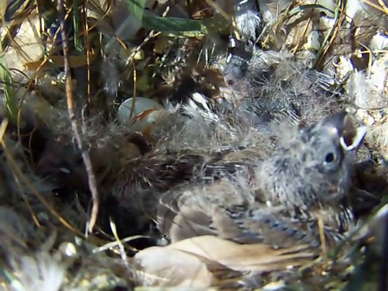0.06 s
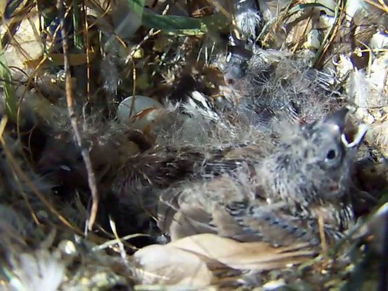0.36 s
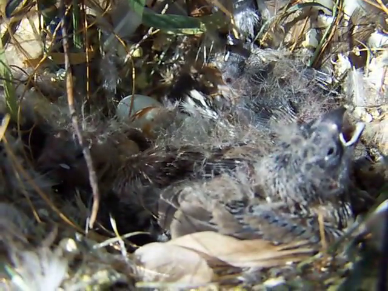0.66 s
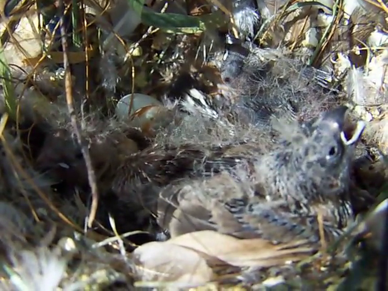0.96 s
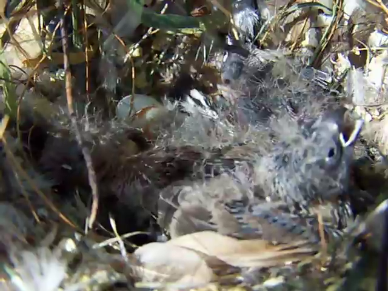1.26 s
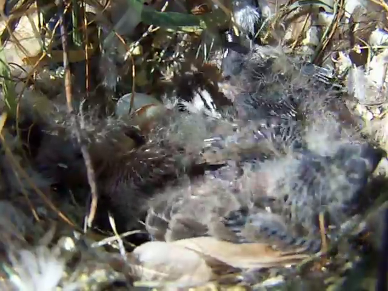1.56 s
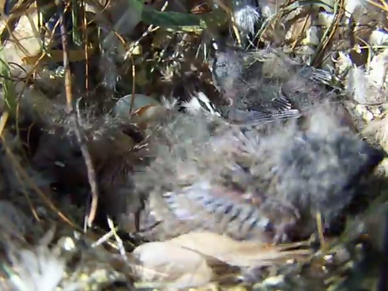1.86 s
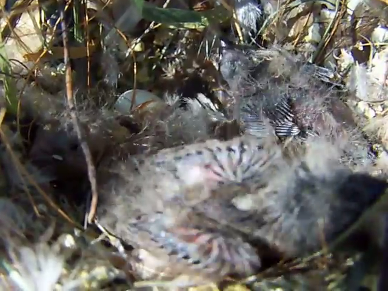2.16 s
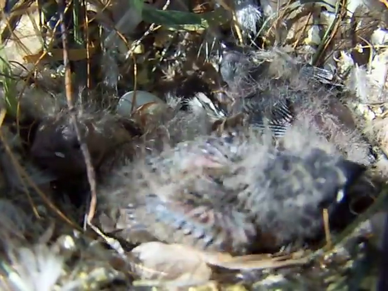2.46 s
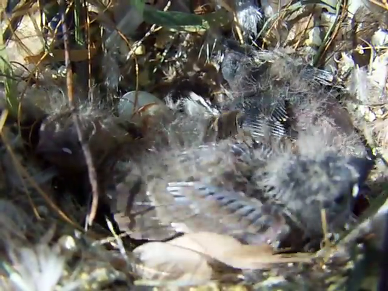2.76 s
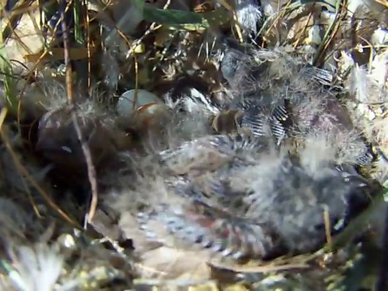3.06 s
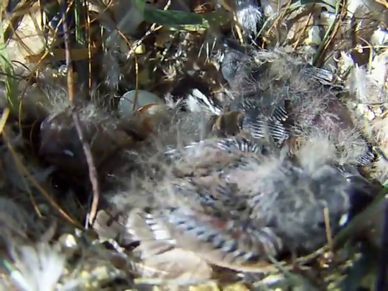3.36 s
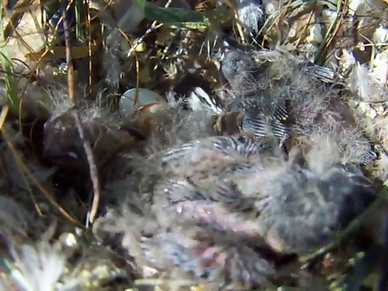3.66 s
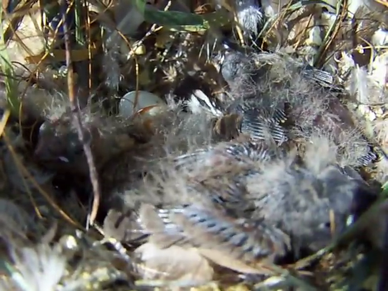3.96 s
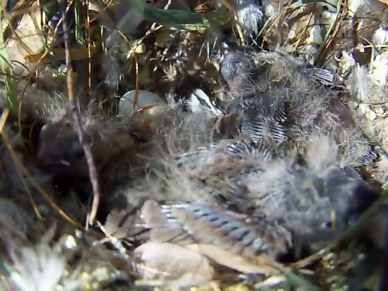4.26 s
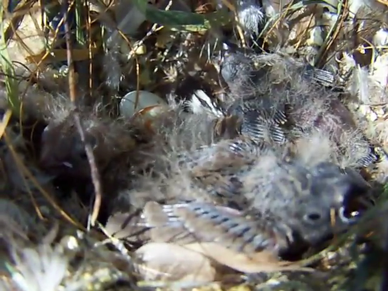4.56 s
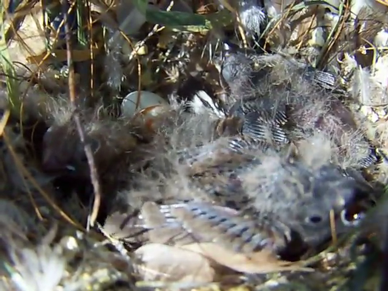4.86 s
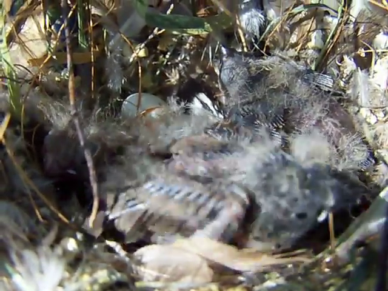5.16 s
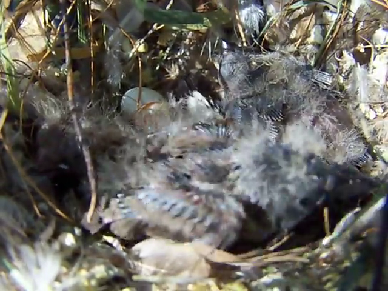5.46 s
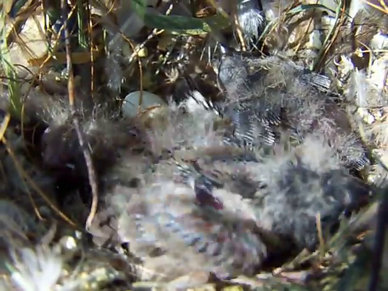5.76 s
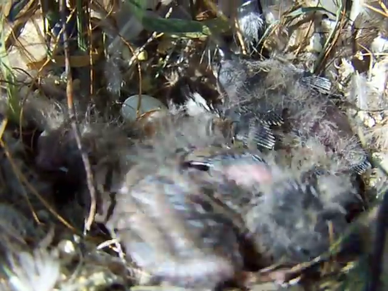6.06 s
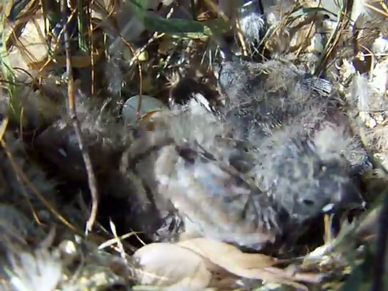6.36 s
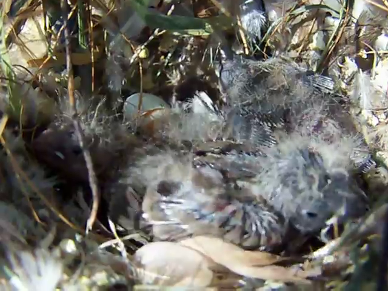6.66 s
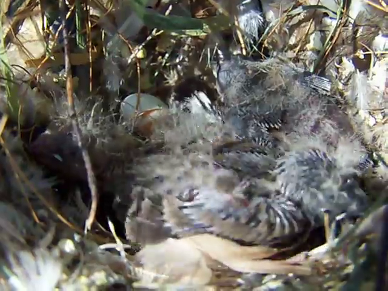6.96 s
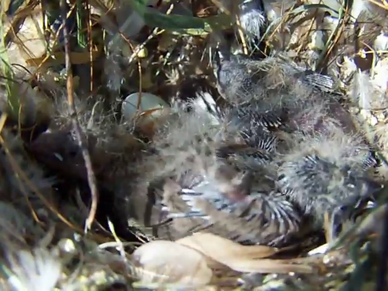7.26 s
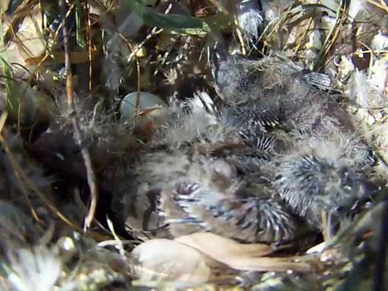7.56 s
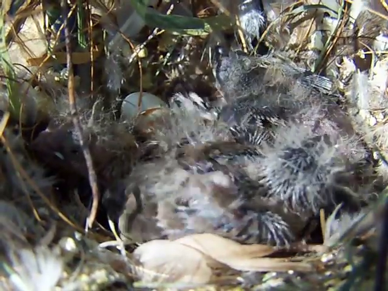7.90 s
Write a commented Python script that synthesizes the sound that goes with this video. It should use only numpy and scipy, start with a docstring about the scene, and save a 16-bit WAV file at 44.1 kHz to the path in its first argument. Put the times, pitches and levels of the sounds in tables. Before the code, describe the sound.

Close, hoarse begging chirps and squeaks from baby finches in a grass nest, with softer finch calls farther off and light rustling.

```python
"""A short squeak over rustling grass and a low rumble, then zebra finch nestlings beg close to the
microphone: nasal, arching calls from a pulsing syrinx that start hoarse and then clear, squeaks between.
A chick shuffles in the lining of the grass nest and bumps it softly. Dry ticks come now and then.
Other finches answer with lower, softer calls from farther off in the reverberant enclosure."""
import sys
import numpy as np
from scipy import signal
from scipy.fft import rfft, irfft, next_fast_len
from scipy.io import wavfile
from scipy.ndimage import uniform_filter1d

SR = 44100
rng = np.random.default_rng(int(sys.argv[2]) if len(sys.argv) > 2 else 0)


def pcm_store(signal):
    """Save signal as 16-bit PCM."""
    levels = np.round(np.clip(np.atleast_2d(signal), -1, 1) * 32767)
    wavfile.write(sys.argv[1], SR, levels.astype(np.int16).T)


N = 349713
TIME = np.arange(N) / SR

# the chick stirring in the nest: t/s, relative rumble level/dB, relative rustle level/dB
NEST_STIRRING = [(0.0, -46.5, -54.5), (0.22, -43, -66), (0.42, -47, -61.5), (0.68, -43, -58),
                 (1.17, -49, -62.5), (1.26, -40.5, -52.5), (2.45, -46.5, -58), (2.67, -38.5, -49),
                 (2.92, -46.5, -59), (3.0, -49, -52), (3.09, -37, -56), (3.93, -46.5, -54),
                 (5.06, -42.5, -59), (5.43, -36, -53.5), (5.81, -43, -57), (7.09, -49.5, -63.5),
                 (7.62, -42, -52), (7.93, -42, -58)]


def from_db(db):
    """Decibels to amplitude."""
    return 10 ** (np.asarray(db) / 20)


def rms_one(x):
    """Scale x to rms 1."""
    return x / np.sqrt(np.mean(x ** 2) + 1e-20)


def at_hz(points, hz):
    """A spectrum's dB at any frequency."""
    knots, db = np.transpose(points)
    return np.interp(np.log(np.maximum(hz, 1)), np.log(knots), db)


def in_time(rows):
    """Each column of a curve at every sample."""
    s, *columns = np.transpose(rows)
    return [np.interp(TIME, s, column) for column in columns]


def add(track, s, sound):
    """Mix a sound in at time s."""
    start = max(int(s * SR), 0)
    track[start:start + len(sound)] += sound[:N - start]


def drift(size, hz):
    """Random wandering up to about hz; spread 1."""
    slow = signal.sosfilt(signal.butter(2, hz, fs=SR, output="sos"), rng.standard_normal(size + SR // 4))
    return rms_one(slow)[-size:]


def coloured(x, spectrum):
    """Give x a spectrum that falls away beyond its ends; rms 1."""
    size = next_fast_len(len(x))
    hz = np.arange(size // 2 + 1) * SR / size
    low_hz, high_hz = spectrum[0][0], spectrum[-1][0]
    ends = np.minimum(hz / low_hz, 1) ** 2 * (high_hz / np.maximum(hz, high_hz)) ** 2
    return rms_one(irfft(rfft(x, size) * from_db(at_hz(spectrum, hz)) * ends, size)[:len(x)])


def swell(u, attack, release):
    """Smooth opening and closing over a call's course u = 0..1; rms 1."""
    opening = np.sin(np.pi / 2 * np.clip(u / attack, 0, 1))
    closing = np.sin(np.pi / 2 * np.clip((1 - u) / release, 0, 1))
    return rms_one(opening * closing)


def whistle(length, centre_hz, glide, hoarse, shake=0.13):
    """A single gliding whistle through the throat, shaken into a rasp when hoarse."""
    # throat response: f/Hz, gain/dB
    throat = [(1300, -12), (2200, -14.5), (3200, -9.5), (4500, -12), (5500, -8), (6500, -15), (8500, -27.5)]
    u = np.linspace(0, 1, int(length * SR))
    pitch = centre_hz * 2 ** (glide * (u - .5)) * (1 + shake * hoarse * drift(len(u), hz=710))
    tone = np.sin(2 * np.pi * np.cumsum(pitch) / SR) * (1 + hoarse * drift(len(u), hz=800))
    return swell(u, attack=0.3, release=0.084) * coloured(tone, throat)


def squeaks():
    """Short whistles from the nest between the begging calls."""
    # squeaks: t/s, length/s, centre f/Hz, glide/octaves, level/dB, hoarseness (0 = clear)
    notes = [(0.0, 0.016, 3560, -.15, -34, 1), (0.136, 0.047, 3680, .08, -34.5, 0.92),
             (2.632, 0.039, 3020, 0.025, -28.5, 0.17), (2.852, .04, 1350, -0.22, -45.5, 0.2),
             (2.858, 0.05, 3594, -0.00062, -32.5, 1.02), (2.999, .042, 3430, -0.13, -30.5, 0.9),
             (3.116, 0.065, 3275, -.25, -35, .6), (3.559, 0.046, 3270, -0.0075, -34, 0.71),
             (3.81, 0.033, 3924, -0.088, -24, 0.4), (4.164, 0.062, 3250, -.2, -38.5, 0.54),
             (4.284, 0.045, 3130, 0.25, -35, 0.53), (4.352, .033, 1323, -.48, -55, 0.1),
             (5.518, .032, 3420, 0.12, -30.5, 0.4), (6.552, .061, 3930, 0.016, -41, 1.06),
             (6.789, 0.07, 3810, -0.12, -37.5, 0.26), (7.64, 0.065, 3370, -.12, -35.5, 0.34),
             (7.658, 0.045, 4420, -.04, -31.5, 0.24), (7.723, .094, 3764, .05, -34, 0.57),
             (7.83, 0.022, 3230, 0.26, -34, 0.84)]
    out = np.zeros(N)
    for s, length, centre_hz, glide, level_db, hoarse in notes:
        add(out, s, from_db(level_db) * whistle(length, centre_hz, glide, hoarse))
    return out


def rustle(per_s=2500, spread_db=2.5, clump_db=2.5, gain_db=4.5):
    """Dry grass and feathers slip in clumps of tiny grains."""
    # spectrum of the nest lining: f/Hz, level/dB
    lining = [(200, -6.5), (350, -1.5), (550, -6), (800, -6), (1500, -3), (3000, -2.5), (5000, -8.5),
              (7000, -14), (8500, -41.5)]
    _, level_db = in_time(NEST_STIRRING)
    slips = (rng.random(N) < per_s / SR) * rng.choice([-1, 1], N)
    sizes = from_db(spread_db * np.minimum(rng.exponential(1, N), 4))
    clumps = from_db(clump_db * drift(N, hz=25))
    return from_db(level_db + gain_db) * coloured(slips * sizes * clumps, lining)


def background(rumble_gain_db=1, hiss_db=-54.5):
    """A low rumble that swells as the chick stirs, and a faint steady hiss."""
    # spectrum of the rumble: f/Hz, level/dB
    rumble_spectrum = [(22, 1), (45, 0), (60, -3), (80, -10.5), (115, -8.5), (160, -13), (220, -18.5),
                       (280, -20.5), (400, -26)]
    # spectrum of the hiss: f/Hz, level/dB
    hiss_spectrum = [(150, -4.5), (400, -7.5), (800, -20.5), (1600, -12), (3300, 0.5), (5000, -8),
                     (7000, -27.5), (8500, -50.5)]
    level_db, _ = in_time(NEST_STIRRING)
    rumble = from_db(level_db + rumble_gain_db) * coloured(rng.standard_normal(N), rumble_spectrum)
    return rumble + from_db(hiss_db) * coloured(rng.standard_normal(N), hiss_spectrum)


def arch(u, top, climb, drop):
    """Pitch climbs with air pressure, reaches 1 at u = top and sags at the end."""
    rise = climb * np.maximum(1 - u / top, 0) ** 2.5
    sag = drop * np.maximum((u - top) / (1 - top), 0) ** 2
    return 1 - rise - sag


def tilt(hz, bright_db, body_db):
    """Effort lifts a region above the beak resonance; a wider throat adds body below it."""
    return bright_db * np.exp(-((hz - 5400) / 1100) ** 2) + body_db * np.clip((2600 - hz) / 900, 0, 1)


def syrinx(pitch, colour_db, rough, jitter=0.011, steady_jitter=0.0038, flutter_db=3.0, air_hz=2500):
    """Harmonics of a pulsing syrinx through the throat; roughness adds uneven cycles and pulsed air."""
    size = len(pitch)
    split_share, air_share = .55, .65
    shaken = pitch * (1 + (steady_jitter + jitter * rough) * drift(size, hz=280))
    phase = 2 * np.pi * np.cumsum(shaken) / SR
    tone = 0
    for k in range(1, 17):
        gain = from_db(colour_db(k * pitch) + flutter_db * drift(size, hz=41.0))
        tone = tone + gain * np.sin(k * phase + rng.uniform(0, 2 * np.pi))
    # strong and weak cycles in twos and threes put extra lines between the harmonics
    uneven = drift(size, hz=50) * np.cos(phase / 2) + drift(size, hz=50) * np.cos(phase / 3)
    tone = rms_one(tone) * (1 + split_share * rough * uneven)
    # the air noise lies in the treble, so the low harmonics stay clear
    hz = np.geomspace(500, 9000, 60)
    air_db = colour_db(hz) - 10 * np.log10(1 + (air_hz / hz) ** 4)
    air = coloured(rng.standard_normal(size) * (1 + np.cos(phase)), np.c_[hz, air_db])
    voice = tone + air_share * rough * air
    return voice / np.sqrt(uniform_filter1d(voice ** 2, size=700) + 1e-12)


def begging(beak_db=9.5, beak_width_hz=320, waver=0.0047):
    """A nestling opens with a thin whistle and a rasp, locks into clear harmonics, then frays."""
    # begging calls: t/s, length/s, top f/Hz, climb and drop (shares of the pitch), relative level/dB,
    # gape of the beak (0-1), hoarseness (0 = clear)
    calls = [(0.156, .13, 714, 0.084, 0.039, -26, .95, 0.16),
             (1.137, 0.13, 625, 0.16, 0.092, -31.5, 0.1, 0.29),
             (1.336, 0.12, 619, 0.18, 0.032, -29, 0, 0.48), (1.57, 0.14, 712, .24, 0.037, -25.5, 0.72, 0.3),
             (1.781, 0.18, 721, .32, 0.024, -25.5, 0.87, 0.78),
             (1.998, .16, 788.6, .37, .015, -24.5, 0.97, 0),
             (2.193, 0.18, 787.4, 0.18, 0.061, -23.5, 0.98, 1.07),
             (2.413, 0.18, 800.4, 0.34, 0.075, -25, 0.97, 1.02),
             (2.68, .104, 617, 0.23, .03, -34, 0.03, 0.78), (3.269, 0.12, 785.5, 0.3, 0, -24, .8, 1.15),
             (3.383, .144, 714.3, .28, 0.067, -20, 0.81, .25),
             (3.633, 0.081, 671, .1, 0.025, -36.3, 0.24, .15), (3.799, 0.2, 690, .15, .095, -23, 0.6, 0.19),
             (4.478, .156, 705, 0.062, .08, -26, 0.4, 1.1),
             (4.687, 0.18, 696, .26, 0.0012, -27.4, 0.83, .65),
             (5.109, 0.12, 608, 0.2, 0.037, -32.5, 0.42, 0.5),
             (5.297, 0.12, 625.7, 0.24, 0.037, -30, 0, 0.41),
             (5.88, 0.16, 705, 0.29, .07, -24.5, 0.32, 0.61), (7.232, 0.17, 696.7, .25, 0.02, -29, .92, .7)]
    # a nestling's throat response: f/Hz, gain/dB
    throat = [(700, -36.5), (1050, -24), (1450, -21.5), (2000, -22), (2400, -12.5), (2850, -7.5),
              (3500, -4), (4150, -1), (4850, -3), (5600, -10), (6300, -23), (7000, -33.5), (8500, -58.5)]
    clear_rough, onset_rough, end_rough = 0.18, 1.2, .55
    clears_at, clearing, top_at, top_delay = 0.36, 0.088, .42, .3   # shares of the call
    out = np.zeros(N)
    for s, length, top_hz, climb, drop, level_db, gape, hoarse in calls:
        u = np.linspace(0, 1, int(length * SR))
        rasp = onset_rough * hoarse / (1 + np.exp((u - clears_at) / clearing))
        rough = clear_rough + rasp + end_rough * u ** 8
        # a wider gape raises the beak resonance and adds treble and body
        beak_hz = np.interp(gape, (0, 1), (3526, 3755))
        bright_db = np.interp(gape, (0, 1), (-20, -0.5))
        body_db = np.interp(gape, (0, 1), (-1.5, 2.5))

        def colour_db(hz):
            resonance_db = beak_db / (1 + ((hz - beak_hz) / beak_width_hz) ** 2)
            return at_hz(throat, hz) + tilt(hz, bright_db, body_db) + resonance_db
        crescendo_db = np.interp(u, (.25, .75), (-1, 1))
        level = from_db(level_db + crescendo_db) * swell(u, attack=.29, release=.18)
        pitch = top_hz * arch(u, top_at + top_delay * hoarse, climb, drop)
        slump = 0.024 * u ** 10   # the air runs out
        pitch = pitch * (1 - slump + waver * drift(len(u), hz=45))
        add(out, s, level * syrinx(pitch, colour_db, rough))
        # the thin falling whistle starts just ahead, well below the call's treble in level
        lead_in = whistle(length=0.072, centre_hz=5720, glide=-.16, hoarse=0.73)
        add(out, s - .011, from_db(level_db + bright_db - 17.5) * lead_in)
    return out


def ticks(faint_per_s=5.0, faint_db=-41, spread_db=-2.5):
    """Dry ticks with no ring, fuller with a longer decay; fainter ones fall at random between them."""
    # faint dry ticks: t/s, peak level/dB, decay time/s
    clicks = [(0.178, -23, 0.000049), (0.275, -28, 0.00006), (.433, -35, 2e-5), (.9403, -28, 2e-5),
              (1.2288, -25, 2e-4), (1.853, -22, 0.000027), (2.281, -22, 0.000024), (2.3398, -20, 0.00011),
              (2.451, -20, 2e-5), (3.345, -19, 0.000095), (3.477, -17.5, 0.00015), (3.8417, -21, 0.000024),
              (3.93, -22, 0.000046), (5.3476, -27, 0.000022), (5.9562, -20.5, 0.00012),
              (7.3291, -23, 0.000042), (7.5516, -28, 3e-5), (7.8546, -30, 2e-5)]
    sizes = from_db(faint_db + spread_db * np.minimum(rng.standard_normal(N), 1))
    out = (rng.random(N) < faint_per_s / SR) * sizes
    t = TIME[:SR // 200]
    for s, peak_db, decay_s in clicks:
        add(out, s, from_db(peak_db) * np.exp(-t / decay_s))
    return out


def contact_calls(onset_rough=0.73, clear_rough=.25, waver=0.0095, bright_db=4.5):
    """Finches farther off give lower, flatter calls that open with a rasp and waver around one arch."""
    # contact calls: t/s, length/s, top f/Hz, relative level/dB, body/dB
    calls = [(0.348, 0.12, 526, -41.5, -10), (0.504, .1, 533, -42, -4.5), (0.663, 0.11, 551, -41.5, -9.5),
             (0.862, 0.087, 544, -44, -7), (0.991, .17, 525, -45, -14), (1.259, 0.092, 536, -39, -9),
             (1.724, .16, 520.7, -34, -7.5), (1.939, 0.069, 522, -35.5, -7), (2.566, 0.11, 553, -40.5, -10),
             (2.921, .1, 543, -42, -3.5), (3.014, 0.075, 540.4, -37, -9.5), (3.169, .094, 513.7, -37.5, -4),
             (3.68, 0.11, 498.4, -36, -8), (3.991, .08, 556, -42, -3), (4.177, 0.11, 489, -43, -8),
             (4.327, 0.19, 519.5, -40.5, -13.5), (4.622, .1, 523.4, -37, -12),
             (4.875, 0.11, 535, -40.5, -8.5), (4.979, 0.1456, 516, -37.5, -4),
             (5.208, 0.07, 525, -44, -6.5), (5.424, .1, 516, -48.5, -2), (5.545, 0.088, 471, -39.5, -9.5),
             (5.677, 0.11, 504.4, -47, -1.5), (5.832, 0.086, 558, -35.5, -12),
             (6.026, 0.0646, 507.6, -36.5, -6.5), (6.134, 0.11, 569, -43, -4.5),
             (6.155, 0.075, 477, -38.5, -13.5), (6.275, .115, 535, -44, -8), (6.405, 0.073, 516, -50, -5),
             (6.494, 0.1, 544, -46.5, 1.5), (6.709, .19, 547, -45, -7), (6.907, 0.12, 545, -40, -11),
             (7.046, 0.085, 499, -48, 1), (7.123, .12, 541, -44.5, -9), (7.404, 0.089, 569, -39.5, -10),
             (7.527, 0.1, 550, -39, -11), (7.697, 0.14, 507, -37.5, -8), (7.877, 0.093, 533, -39.5, -5.5)]
    # their throat response: f/Hz, gain/dB
    throat = [(500, -22), (1050, -9), (1550, -6), (2100, -2.5), (2650, -4), (3150, 0.5), (3700, 1.5),
              (4300, -6), (5000, -16.5), (5700, -26), (6500, -26), (8500, -50.5)]
    out = np.zeros(N)
    for s, length, top_hz, level_db, body_db in calls:
        u = np.linspace(0, 1, int(length * SR))
        pitch = top_hz * arch(u, top=.55, climb=0.12, drop=0.04) * (1 + waver * drift(len(u), hz=40))
        rough = clear_rough + onset_rough * (1 - u) ** 3
        voice = syrinx(pitch, lambda hz: at_hz(throat, hz) + tilt(hz, bright_db, body_db), rough)
        add(out, s, from_db(level_db) * swell(u, attack=0.19, release=0.072) * voice)
    return out


def knocks(scuff_s=0.032):
    """The chick bumps the nest: a short scuff into its damped modes."""
    # soft bumps: t/s, peak level/dB
    bumps = [(2.625, -47), (3.069, -42.5), (3.774, -34.5), (4.216, -49), (5.53, -50)]
    # the nest's modes: f/Hz, level/dB, t60/s
    modes = [(270, -10, 0.18), (400, -7, 0.025), (538, 0, 0.083), (1130, 2, 0.083)]
    out, t = np.zeros(N), TIME[:SR // 6]
    ring = sum(from_db(db - 60 * t / t60) * np.sin(2 * np.pi * hz * t) for hz, db, t60 in modes)
    for s, peak_db in bumps:
        scuff = rng.standard_normal(len(t)) * np.exp(-t / scuff_s)
        bump = signal.fftconvolve(scuff, ring)
        add(out, s, from_db(peak_db) * bump / np.abs(bump).max())
    return out


def enclosure(x, early_db, tail_db, early_s=0.021, early_per_s=1500, t60_s=0.4, wall_hz=5500):
    """Quick reflections from close surfaces, then a duller diffuse tail; overall level is kept."""
    t = TIME[:int(.7 * SR)]
    reflections = rng.standard_normal(len(t)) * (rng.random(len(t)) < early_per_s / SR)
    early = reflections * np.exp(-t / early_s) * (t > .002)
    tail = rng.standard_normal(len(t)) * from_db(-60 * t / t60_s) * (t > .01)
    tail = signal.sosfilt(signal.butter(2, wall_hz, fs=SR, output="sos"), tail / np.linalg.norm(tail))
    echoes = from_db(early_db) * early / np.linalg.norm(early) + from_db(tail_db) * tail
    power = 1 + from_db(early_db) ** 2 + from_db(tail_db) ** 2
    return (x + signal.fftconvolve(x, echoes)[:N]) / np.sqrt(power)


def scene():
    """Mono, beside the nest: the chicks close and fairly dry, their neighbours with more of the room."""
    chicks = from_db(1.5) * begging() + squeaks()
    neighbours = from_db(2.5) * contact_calls()
    near = enclosure(chicks, early_db=-11, tail_db=-10)
    far = enclosure(neighbours, early_db=-6, tail_db=-8)
    return (near + far + ticks() + knocks() + rustle() + background())[None]


def record(dry):
    """A small camera microphone whose top is cut steeply; its converter sits slightly off zero."""
    cutoff_hz, dc_offset = 8700, .01
    return signal.sosfilt(signal.ellip(10, .3, 80, cutoff_hz, fs=SR, output="sos"), dry) + dc_offset


dry = scene()
out = record(dry)
pcm_store(out)
```